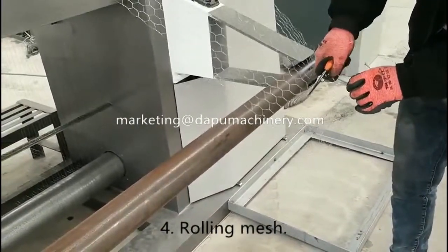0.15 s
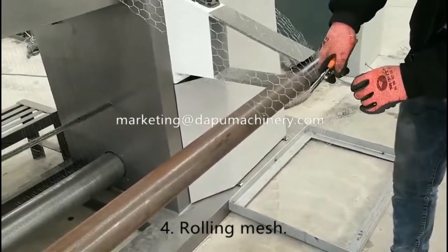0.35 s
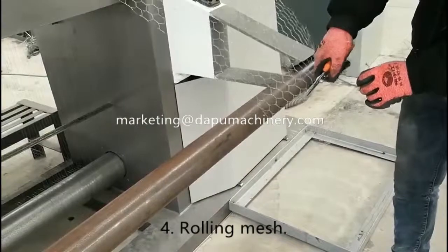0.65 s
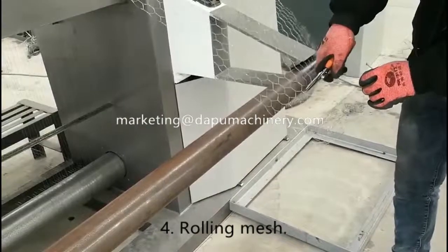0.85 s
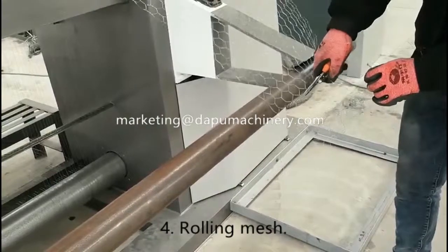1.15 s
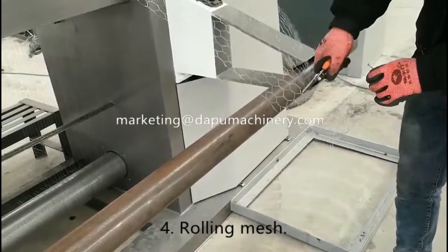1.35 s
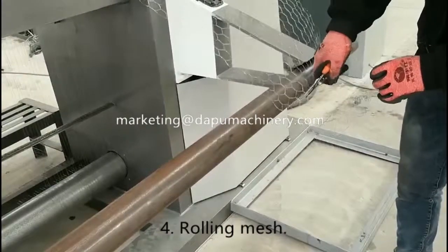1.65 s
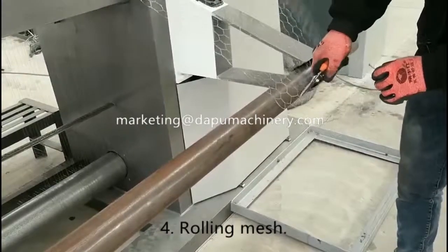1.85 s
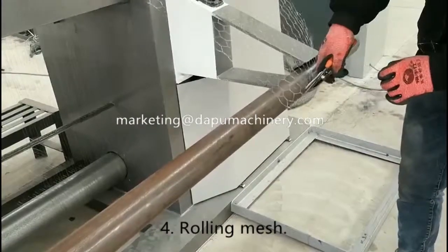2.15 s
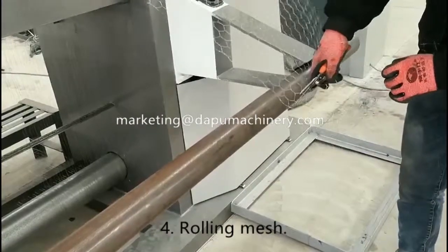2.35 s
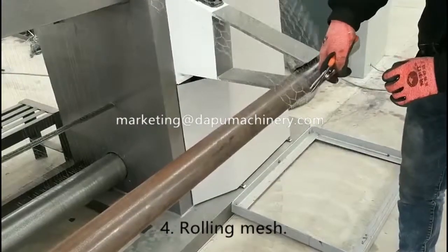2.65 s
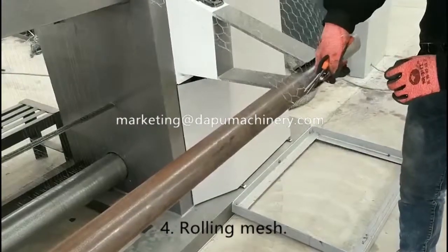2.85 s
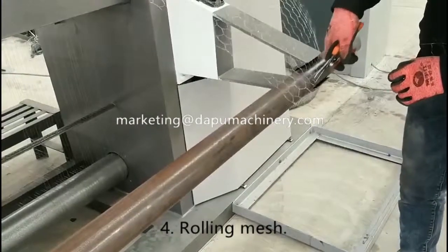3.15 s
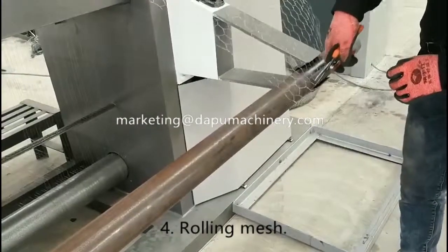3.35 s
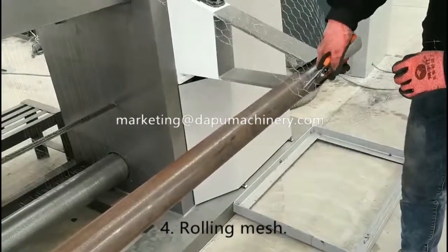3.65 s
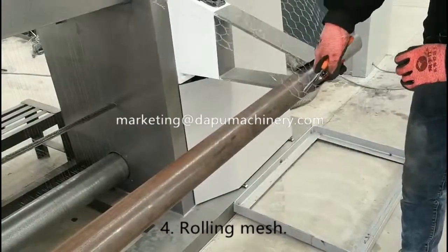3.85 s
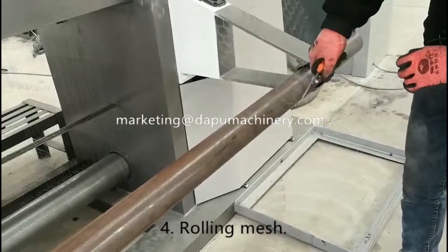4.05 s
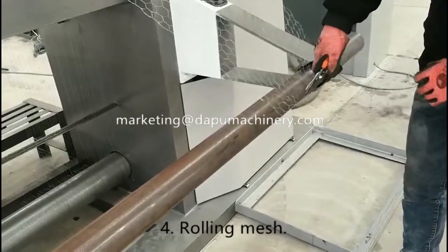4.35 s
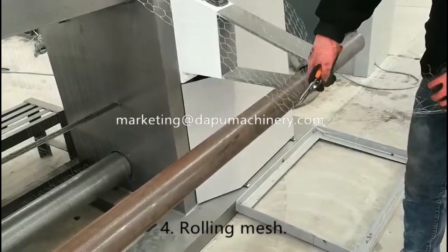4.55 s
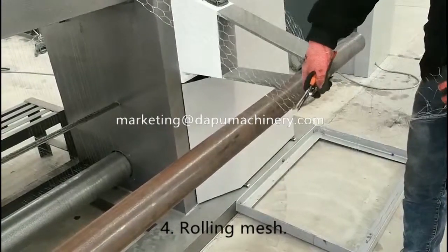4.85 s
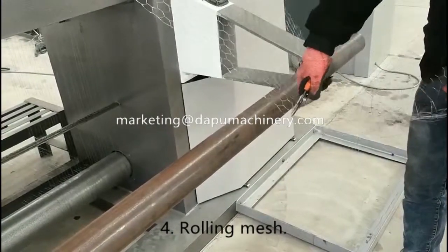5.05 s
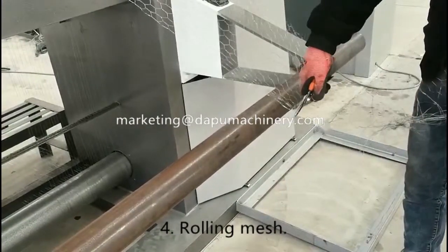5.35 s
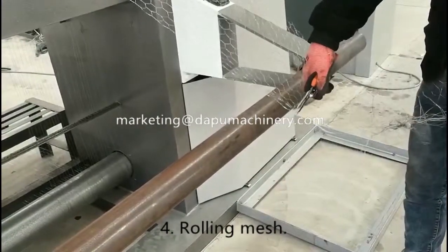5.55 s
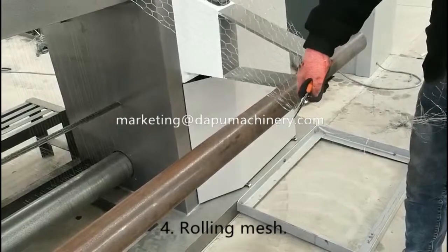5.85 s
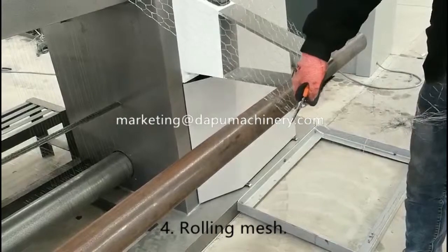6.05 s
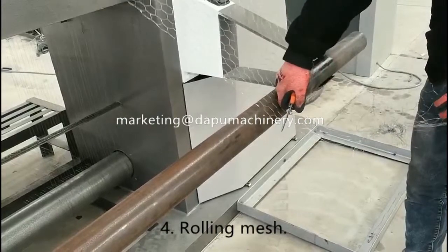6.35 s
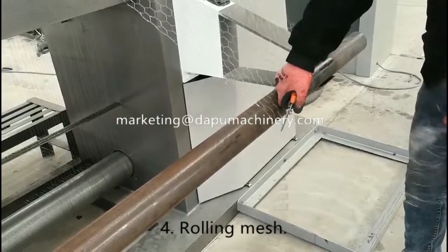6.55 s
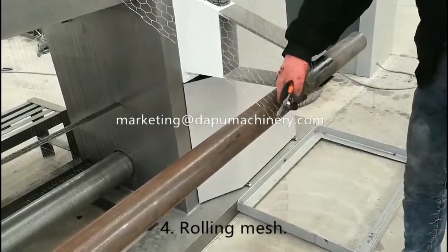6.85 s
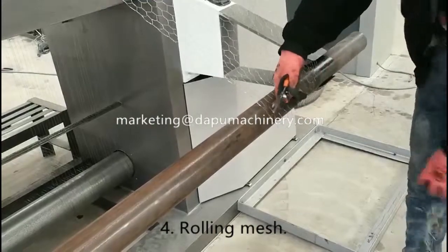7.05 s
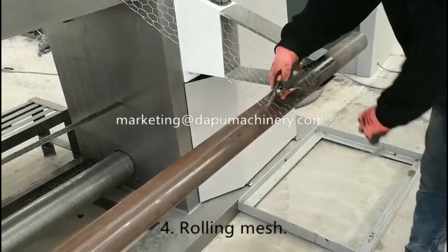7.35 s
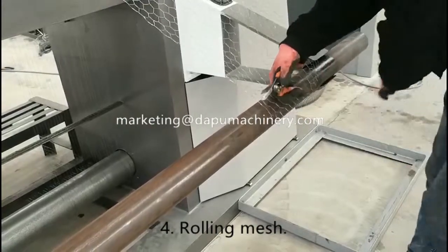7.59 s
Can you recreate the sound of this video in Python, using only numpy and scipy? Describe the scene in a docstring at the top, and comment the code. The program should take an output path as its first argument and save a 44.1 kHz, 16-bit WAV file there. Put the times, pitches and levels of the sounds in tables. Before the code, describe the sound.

Loud, bright wire cuts crack at uneven intervals and echo through a large workshop, with small ticks, a distant boom and rumbling motors.

```python
"""Cutting wire mesh in a factory hall

Pliers snip wire mesh off a steel roller: each cut is a snap pulse with the jaws' resonances, which
arrives by several paths, as scatter off the machine's panels and as reverberation of the hall.
A wire squeaks (a gliding sine), small ticks fall between the cuts (scattered pulses), something heavy
bangs further off (resonant pulses and a boom), soles thud as the worker shifts his feet, and his
jacket swishes (shaped noise).
Behind lie the machines: a swelling sine drone, noise rumble and din, and wavering motor tones."""
import sys
import numpy as np
from scipy import signal
from scipy.fft import rfft, irfft
from scipy.io import wavfile

SR = 44100
rng = np.random.default_rng(int(sys.argv[2]) if len(sys.argv) > 2 else 0)


def transcribe(u):
    """Save the signal u as a 16-bit wav file named by the first command-line argument.

    u: samples, shape (n,) or (channels, n), limited to [-1, 1]; the rate is SR.
    q: integer samples, one column per channel.
    """
    v = np.clip(np.atleast_2d(u).T, -1, 1)
    q = np.round(v * 32767).astype(np.int16)
    wavfile.write(sys.argv[1], SR, q)


N = 340535
TIME = np.arange(N) / SR

# Levels are relative unless called rms or peak; a positive left-right difference leans left.
# Bites of the jaws: [t/s, snap level/dB, ring level/dB, ring f/Hz, treble level/dB,
# top-octave level/dB, scatter level/dB, left-right difference of the ring/dB]
SNIPS = [(-.075, 0, 1.5, 2730, 0.5, 1, -7, -4), (0.563, 0, -21, 3000, -6.5, 2.5, 2, -7),
         (1.0993, 3, -2, 2720, -3.5, 4.5, -1, -4), (1.5850, -26, 2.5, 1870, -9, 0, -13, 3),
         (1.6292, 1.5, 4, 2670, -2.5, 6, -3, -9.5), (3.8467, -12.5, -15, 1440, -13, 1, 6, 10),
         (3.8956, -3, -15, 2680, -2, -1, 1, -13), (4.9906, -2, -10, 1730, -1.5, 0, 3.5, 7),
         (6.3440, 1.5, 5, 2896, 4, -0.5, 0, -3.5)]
# Small ticks of jaws, wire ends and catching cloth: [t/s, level/dB, treble level/dB]
SMALL_TICKS = [(1.042, -26.5, -4), (1.211, -29, -14), (1.447, -27, -4), (1.555, -25, -4),
               (2.041, -43, 18.5), (2.073, -27.5, 5.5), (2.428, -44, 9), (3.8141, -14, -3.5),
               (4.748, -33, 16.5), (4.933, -25, 3), (5.657, -40.5, 8), (5.743, -34.5, 5.5),
               (6.184, -23, -16), (6.705, -44, 16)]
# Spectrum of the parting wire and the jaws: [f/Hz, level/dB]
SNAP_SPECTRUM = [(200, -48), (700, -30.5), (1200, -17.5), (1500, -8.5), (1900, 0), (2300, -6), (3600, -4),
                 (4400, -8.5), (5700, -11), (7100, -5.5), (8300, -13.5), (10000, -10), (12000, -18.5),
                 (15000, -26.5)]
# Resonances of the pliers: [ratio to the ring pitch, width/Hz, level/dB]
PLIERS_MODES = [(0.999, 370, 14), (1.16, 443, -11.5), (2.4, 914, -15.5)]
# Ways to the ear; the roller carries a dull forerunner ahead of the air:
# [delay t/s, level/dB, treble level/dB]
PATHS = [(-.00413, -6.5, -18), (0, 1, -4), (.00413, -7, 0)]
# Reverberation time of the hall: [f/Hz, t60/s]
HALL_T60 = [(80, 1.05), (300, 3.5), (850, 3.82), (1600, 2.18), (3000, 1.17), (7000, 0.84), (14000, 0.76)]

# Wire squeaking in the jaws as they twist to and fro
SQUEAK_S, TWIST_S = 3.752, 0.16  # onset and length of one twist
SQUEAK_HZ, SQUEAK_PEAK_DB = 9100, -67  # at full speed
SQUEAK_SAG, SQUEAK_JITTER_HZ = 0.08, 70  # share of pitch lost at the slow ends; rms jitter

# Spectrum of the heavy blow: [f/Hz, level/dB]
BANG_SPECTRUM = [(70, -27), (140, -17), (250, 2), (500, -7), (1000, -2), (1400, -6.5), (2100, -10.5),
                 (2700, -14), (3900, -42), (8000, -39), (14000, -62)]
# Resonances of the struck thing: [f/Hz, width/Hz, level/dB, left-right difference/dB]
BANG_MODES = [(216, 30, 14, 3), (417, 90, 8, -6), (686, 43, 6.1, 18), (1800, 52, 1, 3)]
# Spectrum that the blow sends into the hall: [f/Hz, level/dB]
BANG_HALL_SPECTRUM = [(60, -39.5), (140, -5), (250, -7), (420, -9.5), (560, -16.5), (720, -9), (960, -9.5),
                      (1200, -18.5), (1650, -14.5), (2300, -17), (3400, -30), (7000, -53)]

# Shoes on the floor: [t/s, level/dB, left-right difference/dB]
STEPS = [(2.076, -1.5, -1), (2.128, -10.5, 0), (5.572, -14.5, -2), (5.755, -5.5, -3), (6.425, -6, -2)]
# Spectrum of a sole on the floor: [f/Hz, level/dB]
SOLE_SPECTRUM = [(60, -18), (140, -6.5), (230, -0.5), (340, -6), (550, -15), (900, -18.5), (2000, -37),
                 (6000, -57)]

# Strokes of cloth on cloth: [t/s at full speed, hold/s, rms level/dB, left-right difference/dB,
# share of sleeve against glove (0-1)]
RUBS = [(4.796, 0.041, -47, -4, 0), (5.378, 0.022, -58.5, -4, 0), (5.489, .04, -53, -2, 0),
        (7.226, 0.21, -45.5, 3, 0.92)]
RUB_RISE_DB_PER_S, RUB_FALL_DB_PER_S = 220, 165
# Spectrum of the glove's rubbing: [f/Hz, level/dB]
GLOVE_SPECTRUM = [(1000, 3), (4000, -4), (7300, -0.5), (8600, -5.5), (11500, -11), (15000, -26)]
# Spectrum of the sleeve's rubbing: [f/Hz, level/dB]
SLEEVE_SPECTRUM = [(500, -13), (2500, -6), (4500, -5.5), (5500, 2), (6400, -5), (8000, -5.5), (9700, -3.5),
                   (11500, -17), (15000, -20)]

# The motors' deep drone before its flutter: [t/s, rms level/dB]
DRONE_SWELL = [(0.0, -54), (0.06, -41), (0.86, -33), (1.74, -46), (2.49, -36), (3.31, -31.5), (3.67, -39),
               (7.61, -44), (7.72, -43)]
DRONE_HZ, DRONE_WANDER_RAD, DRONE_FLUTTER = 49.14, 0.63, 0.49  # wander and flutter are rms
# Spectrum of the machines' bass: [f/Hz, level/dB]
RUMBLE_SPECTRUM = [(15, -11), (25, -3.5), (32, -9.5), (44, -3.5), (62, -5.5), (90, -8.5), (125, -15),
                   (180, -36), (400, -69.5)]
# Spectrum of the machines' din: [f/Hz, level/dB]
DIN_SPECTRUM = [(71, -42), (120, -1.5), (240, -10), (271, -9), (300, -10.5), (367, -15.5), (398, -12.5),
                (459, -19), (812, -17), (1410, -23), (2030, -20.5), (3240, -35), (4000, -43), (5500, -45),
                (9710, -54), (11000, -51), (15500, -72)]
RUMBLE_RMS_DB, DIN_RMS_DB = -36, -44.5
# Motor hum and inverter whine: [f/Hz, rms level/dB]
HUM_TONES = [(99.5, -46.5), (200, -57), (300, -61.5), (2073, -67.5), (5335, -89), (10664, -85)]
# Likeness of left and right in surrounding sound: [f/Hz, correlation]
EAR_LIKENESS = [(60, 1), (130, 1), (290, 0.86), (640, -0.4), (1400, 0.19), (3000, -0.12)]

EDGE_HZ = 15700  # upper limit of the recorded band


def snip(snap_db, ring_db, ring_hz, treble_db, top_db, scatter_db, side_db,
         ear_lag_s=0.00009, hall_width_hz=900):
    """Impulsive excitation: the parting wire snaps, rings the pliers and reaches the ear many ways."""
    def blow(shelf_db):
        """Modal resonance: one pulse per ear, with the ring weighted to one side."""
        ears = [[(ring_hz * ratio, width, db + ring_db + ear * side_db / 2)
                 for ratio, width, db in PLIERS_MODES] for ear in (1, -1)]
        pulses = np.array([click(SNAP_SPECTRUM, treble_db + shelf_db, top_db, modes) for modes in ears])
        # the pliers are to the right: the left ear hears them later
        return disperse(pulses, spread_s=0.0023, lag_s=np.array([[ear_lag_s], [0]]))

    out = np.zeros((2, 2 * SR))
    lead = -PATHS[0][0]  # room for the forerunner
    direct = blow(0)
    for delay, db, shelf_db in PATHS:
        add(out, lead + delay, amp(db) * blow(shelf_db))

    # the wire crushes before it parts
    crush = convolve(direct, scatter(t60=0.015, rise_s=0.0013))
    add(out, 0.0002, amp(scatter_db - 7) * crush)
    panels = convolve(direct, scatter(t60=0.057, rise_s=0.00031))
    add(out, lead, amp(scatter_db) * panels)

    # all directions together ring more broadly
    broad_ring = [(1.06 * ring_hz, hall_width_hz, ring_db + 9)]
    all_round = click(SNAP_SPECTRUM, treble_db, top_db, broad_ring)
    add(out, lead + 0.012, amp(-16) * convolve(all_round, hall(rise_s=0.004)))
    # a far wall sends back a soft swell
    far_wall = convolve(all_round, scatter(t60=0.35, rise_s=0.0047))
    add(out, lead + 0.045, amp(-17.5) * far_wall)
    return amp(snap_db + 11) * out


def snips_and_ticks():
    """Superposition: all cuts and small ticks add up, each with its answer from the hall."""
    out = np.zeros((2, N))
    answer = hall(rise_s=0.013)
    for s, *row in SNIPS:
        add(out, s + PATHS[0][0], snip(*row))
    for s, db, treble_db in SMALL_TICKS:
        tick = amp(db + 9) * click(SNAP_SPECTRUM, treble_db)
        add(out, s, convolve(tick, scatter(t60=0.06, rise_s=0.0006)))
        add(out, s, amp(-0.5) * convolve(tick, answer))
    return out


def squeak(count=2):
    """Friction whistle of wire on steel: pitch and level follow the arching speed of each twist."""
    out = np.zeros((2, N))
    t = np.arange(0, count * TWIST_S, 1 / SR)
    speed = abs(np.sin(np.pi * t / TWIST_S))
    jitter_hz = SQUEAK_JITTER_HZ * drift(310)[:len(t)]
    hz = SQUEAK_HZ * (1 - SQUEAK_SAG * (1 - speed)) + jitter_hz
    phase = 2 * np.pi * np.cumsum(hz) / SR
    add(out, SQUEAK_S, amp(SQUEAK_PEAK_DB) * speed * np.sin(phase) * pan(0))
    return out


def bang(s=4.8347, boom_hz=85, boom_t60=0.44, ear_lag_s=0.000584):
    """Modal response to a heavy blow from the left: push, clatter, booming panel and hall wash."""
    out = np.zeros((2, N))
    ears = [[(hz, width, db + ear * side_db / 2) for hz, width, db, side_db in BANG_MODES]
            for ear in (1, -1)]
    pulses = np.array([click(BANG_SPECTRUM, peaks=modes) for modes in ears])
    push = disperse(pulses, spread_s=0.014, lag_s=np.array([[0], [ear_lag_s]]))
    add(out, s, amp(25.5) * push)

    clatter = convolve(click(BANG_SPECTRUM), scatter(t60=0.09, rise_s=0.0027))
    add(out, s + 0.0035, amp(26.5) * clatter)
    wash = convolve(click(BANG_HALL_SPECTRUM), hall(rise_s=0.0044))
    add(out, s, amp(30) * wash)

    t = np.arange(SR) / SR
    boom_envelope = amp(-13 - 60 * t / boom_t60) * (1 - np.exp(-t / 0.02))
    add(out, s, boom_envelope * np.sin(2 * np.pi * boom_hz * t) * pan(0))
    return out


def steps(thud_hz=240, thud_width_hz=90):
    """Impact of soles on concrete: a hollow resonant thud, a scattered scuff and reverberation."""
    out = np.zeros((2, N))
    answer = hall(rise_s=0.0116)
    thud = click(SOLE_SPECTRUM, peaks=[(thud_hz, thud_width_hz, 7)])
    sole = click(SOLE_SPECTRUM)
    for s, db, side_db in STEPS:
        weight = amp(db + 13) * pan(side_db)
        scuff = convolve(sole, scatter(t60=0.12, rise_s=0.0026))
        add(out, s, weight * thud)
        add(out, s, amp(7.5) * weight * scuff)
        add(out, s, amp(-11) * weight * convolve(sole, answer))
    return out


def jacket(catch_db=-0.6, snag_db=1.3):
    """Friction noise of cloth on cloth: strokes gather speed, hold and die; threads catch, folds snag."""
    out = np.zeros((2, N))
    glove, sleeve = diffuse(N, GLOVE_SPECTRUM), diffuse(N, SLEEVE_SPECTRUM)
    for s, hold, db, side_db, share in RUBS:
        rise_db = RUB_RISE_DB_PER_S * np.maximum(s - TIME, 0)
        fall_db = RUB_FALL_DB_PER_S * np.maximum(TIME - s - hold, 0)
        cloth = glove + share * (sleeve - glove)
        out += amp(db - rise_db - fall_db) * pan(side_db) * cloth
    return out * amp(catch_db * drift(600) + snag_db * drift(50))


def machines():
    """Periodic and random radiation: a fluttering drone and wavering tones over rumble and din."""
    swell = amp(np.interp(TIME, *np.transpose(DRONE_SWELL)))
    flutter = 1 + DRONE_FLUTTER * drift(4.9)
    drone_phase = 2 * np.pi * DRONE_HZ * TIME + DRONE_WANDER_RAD * drift(5)
    drone = swell * flutter * np.sqrt(2) * np.sin(drone_phase)  # root two: peak from rms
    rumble = amp(RUMBLE_RMS_DB) * diffuse(N, RUMBLE_SPECTRUM)
    din = amp(DIN_RMS_DB + 0.11 * drift(1.1)) * diffuse(N, DIN_SPECTRUM) * pan(-1.14)
    hum = np.zeros(N)
    for hz, db in HUM_TONES:
        phase = 2 * np.pi * hz * TIME + 0.71 * drift(3.5)
        hum += amp(db) * np.sqrt(2) * np.sin(phase)
    return drone + rumble + din + hum


def hall(rise_s):
    """Reverberation: the answer swells as the far walls reply, then each band dies at its own speed."""
    hz, t, bands = signal.stft(diffuse(2 * SR), SR, nperseg=256)
    decay = amp(-60 * t / read(HALL_T60, hz)[:, None])
    swell = 1 - np.exp(-(t / rise_s) ** 2)
    tail = signal.istft(bands * decay * swell, SR)[1]
    return tail / np.linalg.norm(tail[0])


def scatter(t60, rise_s):
    """Scattering: dense nearby reflections build up and decay, with a mean energy of one per ear."""
    t = np.arange(SR // 8) / SR
    taps = diffuse(len(t)) * amp(-60 * t / t60) * (1 - np.exp(-t / rise_s))
    return unit(taps) / np.sqrt(len(t))


def diffuse(n, spectrum=None):
    """Diffuse field: stereo noise alike in the bass and nearly unrelated in the treble, rms one."""
    hz = np.fft.rfftfreq(n, 1 / SR)
    left, other = rfft(rng.standard_normal((2, n)))
    same = np.clip(read(EAR_LIKENESS, hz), -1, 1)
    right = same * left + np.sqrt(1 - same ** 2) * other
    gain = amp(read(spectrum, hz)) if spectrum else 1
    return unit(irfft(np.array([left, right]) * gain, n))


def click(points, treble_db=0, top_db=0, peaks=(), size=4096):
    """Minimum phase: a causal pulse from a spectrum, two shelves and peaks [f/Hz, width/Hz, level/dB]."""
    hz = abs(np.fft.fftfreq(size, 1 / SR))
    treble = hz ** 6 / (hz ** 6 + 4500. ** 6)
    top = hz ** 12 / (hz ** 12 + 11000. ** 12)
    gain = amp(read(points, hz) + treble_db * treble + top_db * top)
    resonance = sum(amp(db) / (1 + (2 * (hz - f) / width) ** 2) for f, width, db in peaks)
    gain = gain * (1 + resonance)
    # the Hilbert transform of the log gain gives the phase of a causal pulse
    response = np.exp(np.conj(signal.hilbert(np.log(gain))))
    return np.fft.ifft(response).real[:size // 2]


def disperse(x, spread_s, lag_s):
    """Dispersion: delays a pulse by lag_s and smears it, the treble later than the bass."""
    n = x.shape[-1]
    hz = np.fft.rfftfreq(n, 1 / SR)
    fade = np.cos(np.linspace(0, np.pi / 2, n)) ** 2
    turn = np.exp(-2j * np.pi * hz * (lag_s + spread_s * hz / SR))
    return fade * irfft(rfft(x) * turn, n)


def drift(rate_hz):
    """Band-limited chance: random fluctuation below rate_hz, of rms one."""
    hz = np.fft.rfftfreq(N, 1 / SR)
    return unit(irfft(rfft(rng.standard_normal(N)) * (hz < rate_hz), N))


def amp(db):
    """Logarithmic level: decibels to amplitude gain."""
    return 10 ** (np.asarray(db) / 20)


def unit(x):
    """Normalisation: scales to an rms of one."""
    return x / np.sqrt(np.mean(x ** 2) + 1e-20)


def read(points, hz):
    """Logarithmic pitch scale: interpolates a table along log frequency."""
    f, value = np.transpose(points)
    return np.interp(np.log(hz + 1), np.log(f + 1), value)


def pan(db):
    """Interaural level difference: left and right gains that differ by db."""
    return amp(np.array([[db], [-db]]) / 2)


def convolve(a, b):
    """Linear filtering: convolves channel by channel."""
    return signal.fftconvolve(np.atleast_2d(a), np.atleast_2d(b), axes=1)


def add(mix, s, sound):
    """Superposition: mixes a stereo sound in at time s, cut to the ends of the mix."""
    at = round(s * SR)
    sound = sound[:, max(-at, 0):]
    part = mix[:, max(at, 0):][:, :sound.shape[1]]
    part += sound[:, :part.shape[1]]


def scene():
    """Superposition: the work at the roller and the hall around it."""
    return snips_and_ticks() + squeak() + bang() + steps() + jacket() + machines()


def record(dry, threshold_db=-24, share=0.4, recovery_db_per_s=45):
    """Gain control: level dips just after loud hits, peaks clip at full scale, the band is limited."""
    power = signal.lfilter(np.ones(256) / 256, [1], (dry ** 2).mean(0))
    excess_db = np.maximum(10 * np.log10(power + 1e-12) - threshold_db, 0)
    # a running maximum against a ramp: instant rise, steady recovery
    ramp_db = TIME * recovery_db_per_s
    duck_db = np.maximum.accumulate(share * excess_db + ramp_db) - ramp_db
    keep = np.exp(-1 / (0.02 * SR))  # the gain needs some milliseconds to fall
    smooth_db = signal.lfilter([1 - keep], [1, -keep], duck_db)
    ducked = dry * amp(-smooth_db)
    edge = signal.firwin(255, EDGE_HZ, window=("kaiser", 9), fs=SR)
    return signal.oaconvolve(np.clip(ducked, -1, 1), edge[None], "same", axes=1)


dry = scene()
out = record(dry)
transcribe(out)
```